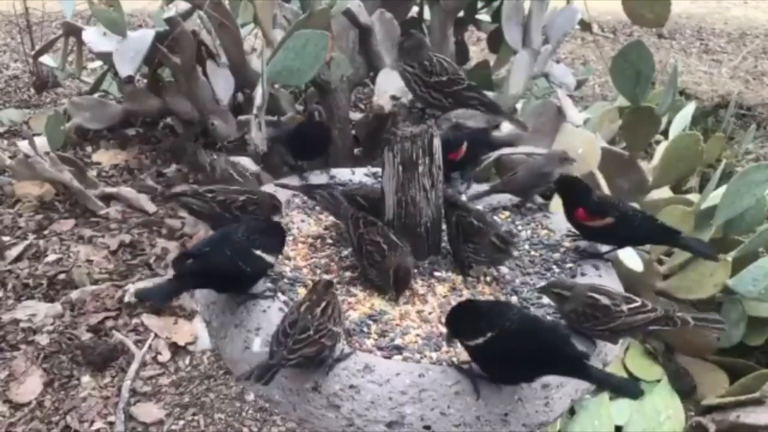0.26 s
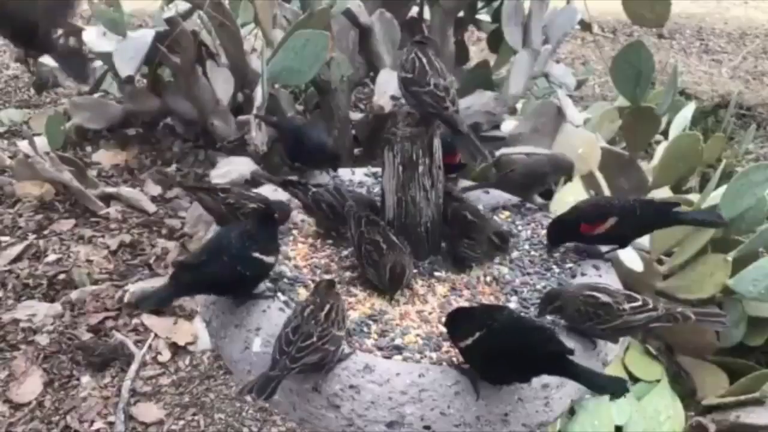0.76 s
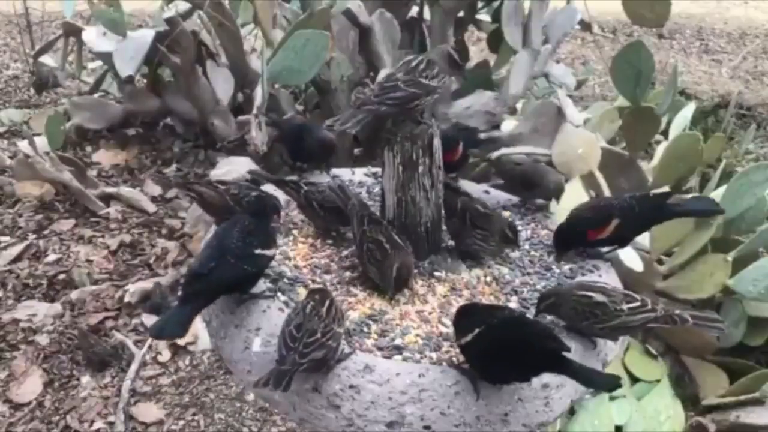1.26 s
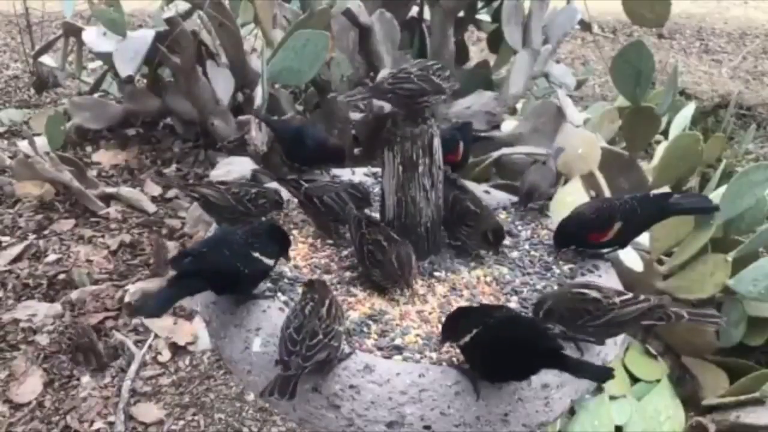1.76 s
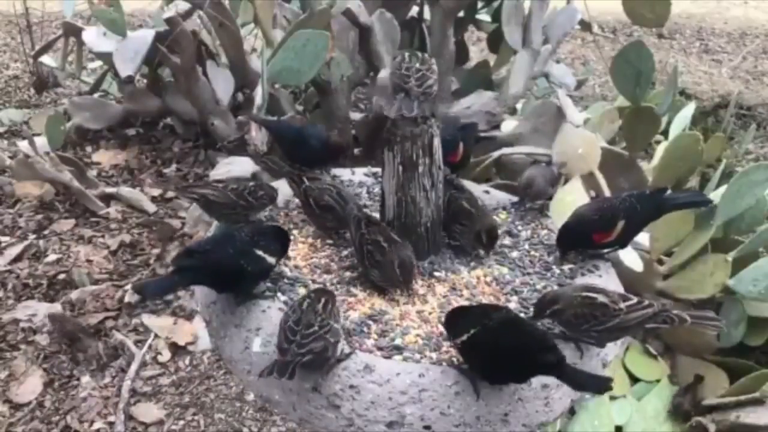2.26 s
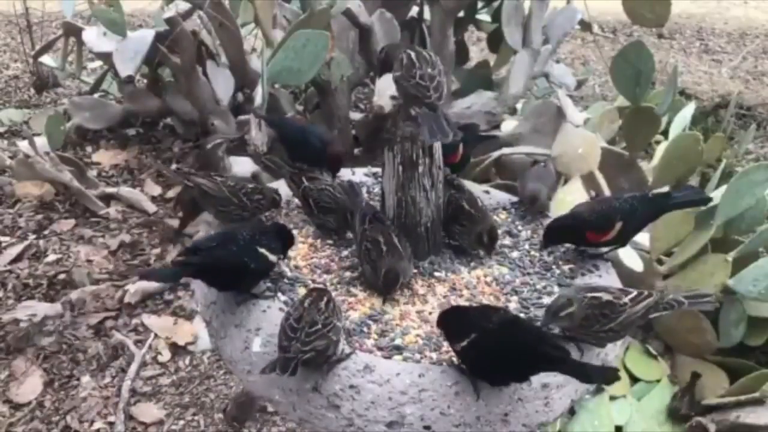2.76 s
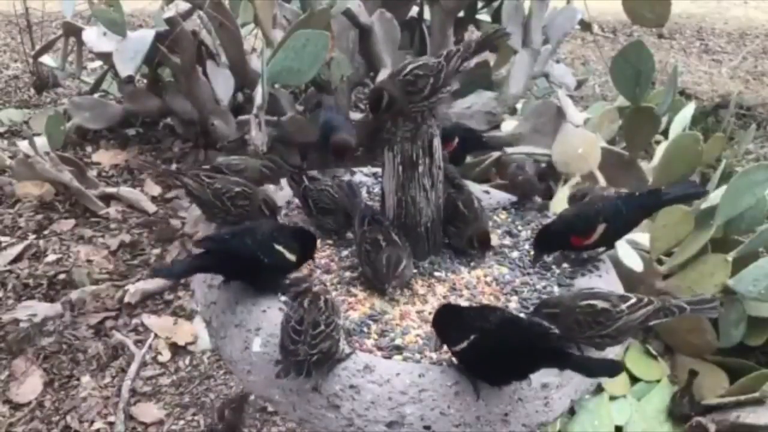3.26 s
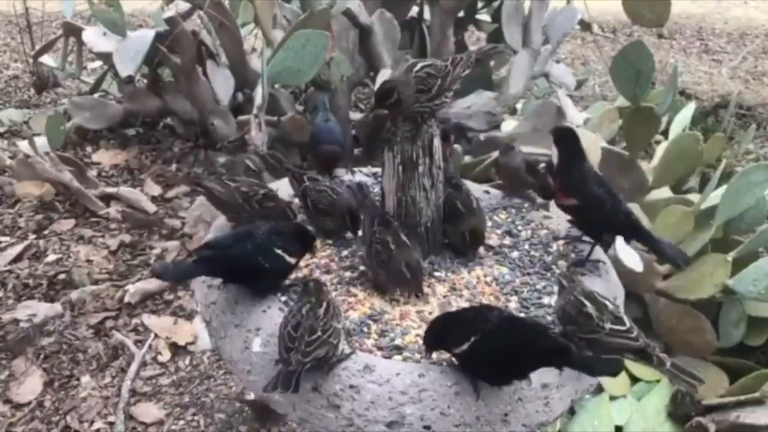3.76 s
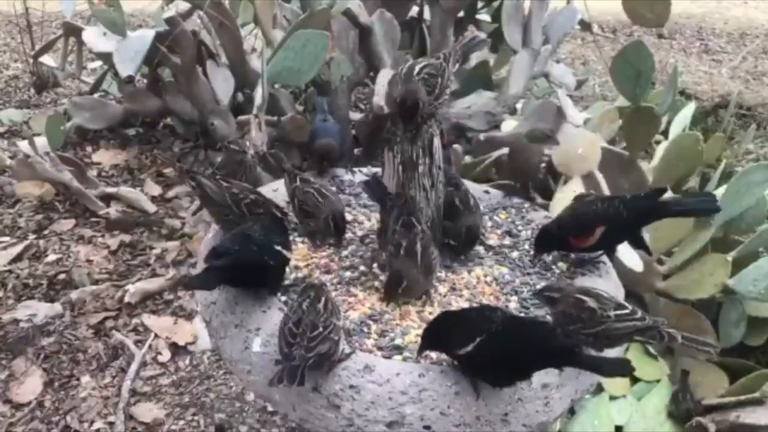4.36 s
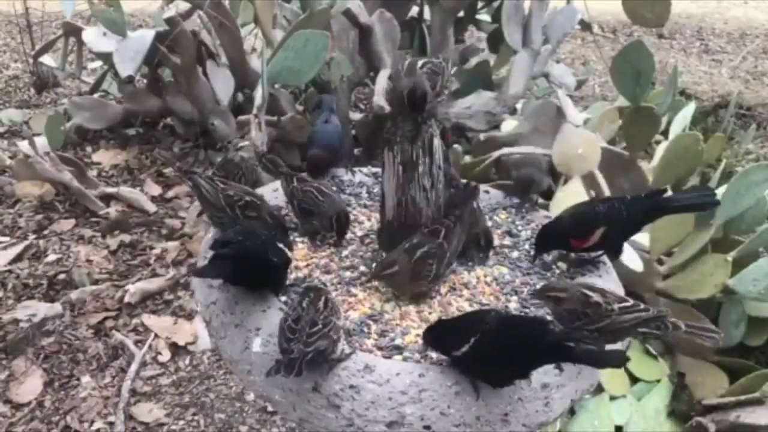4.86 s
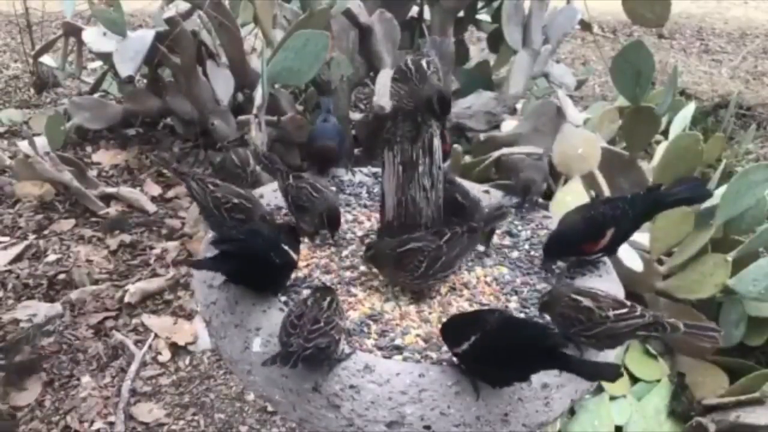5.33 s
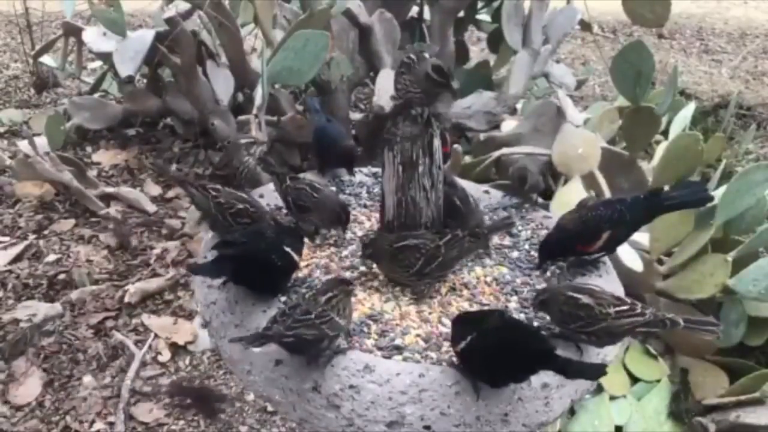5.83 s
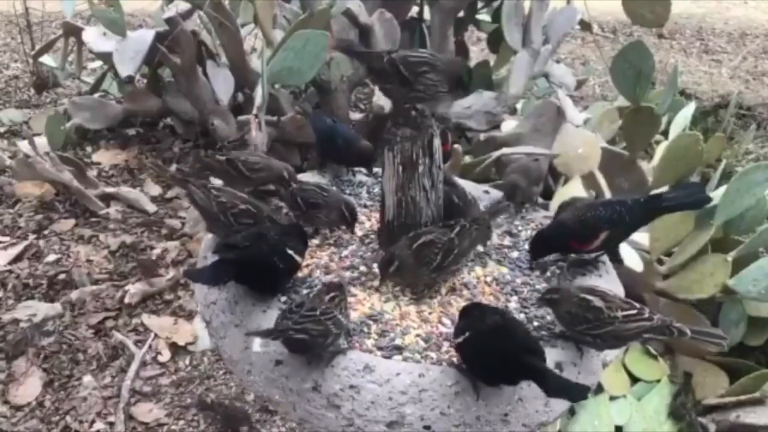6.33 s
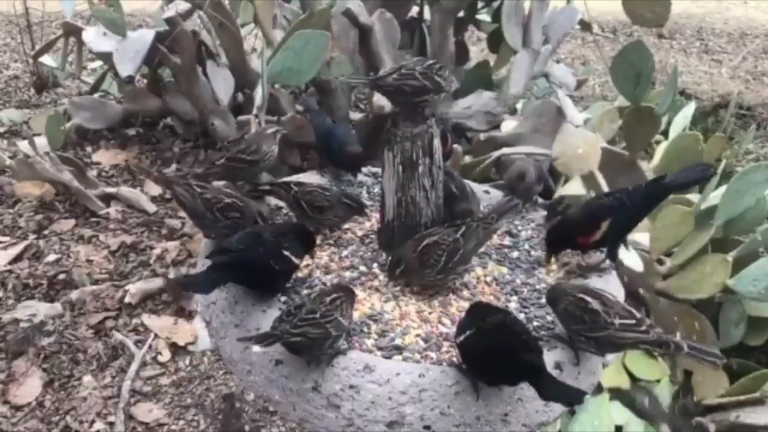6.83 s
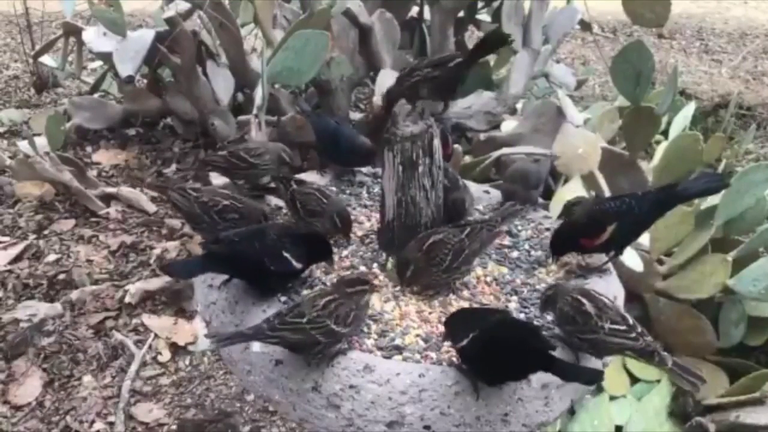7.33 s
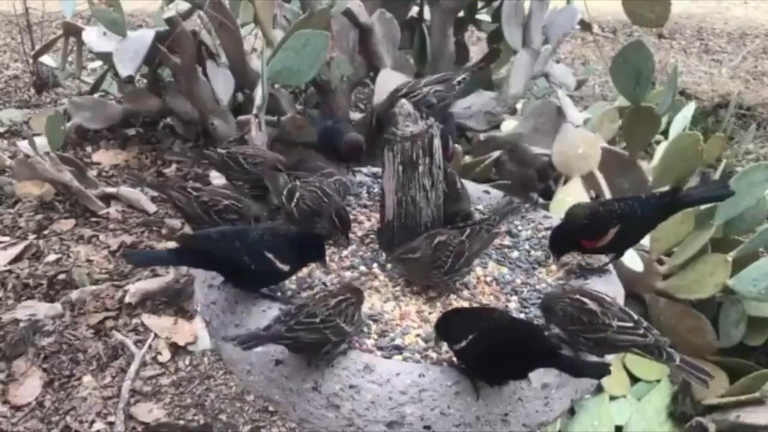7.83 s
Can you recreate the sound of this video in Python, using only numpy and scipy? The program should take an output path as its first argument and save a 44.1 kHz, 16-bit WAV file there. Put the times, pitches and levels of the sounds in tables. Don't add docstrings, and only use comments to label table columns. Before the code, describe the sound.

Blackbirds feed at a stone bowl: sharp husk cracks, beak taps and rustling seed, with clipped chacks, hoarse scolds and gurgles over low traffic rumble.

```python
import sys
import numpy as np
from scipy import signal
from scipy.fft import rfft, irfft, next_fast_len
from scipy.io import wavfile
from scipy.ndimage import map_coordinates

SR = 44100
rng = np.random.default_rng(int(sys.argv[2]) if len(sys.argv) > 2 else 0)


def level_to_linear(level):
    exponent = np.asarray(level, float) / 20
    return 10 ** exponent


def int16_out(signal):
    q = np.round(np.clip(np.atleast_2d(signal).T, -1, 1) * 32767)
    wavfile.write(sys.argv[1], SR, q.astype(np.int16))


N = 356769

# t/s, snap level/dB, knock level/dB, knock f/Hz
HUSK_CRACKS = [(0.1269, -6, -14, 3060), (2.4723, -17, -15, 1890), (2.6325, -19, -20.5, 1800),
               (2.696, -9, -9, 2260), (3.864, -26, -20.5, 3970), (3.904, -17.5, -20, 4500),
               (4.142, -14, -13.5, 2400), (4.429, -18, -14.5, 2800), (4.481, -24, -16, 5130),
               (4.4858, -15.5, -7, 4800), (4.509, -16.5, -19.5, 2420), (4.662, -11, -18.5, 3050),
               (4.681, -18, -22, 5200), (4.77, -16.5, -19, 2210), (5.399, -19, -15, 3790),
               (1.6525, -21.5, -33, 4800), (6.015, -33, -24, 1800), (6.523, -34, -24, 1350),
               (5.821, -23, -28, 4332), (5.9656, -14.5, -21, 1490), (6.3128, -19, -20, 2950),
               (6.3684, -14, -14.5, 3200), (6.7795, -11, -21, 1600), (6.796, -6.5, -17, 2110),
               (7.1027, -25, -11, 2220), (7.1715, -19, -21, 1440), (7.2914, -25, -20.5, 2300),
               (7.328, -30, -16.5, 1900), (7.364, -24, -25, 2520), (7.423, -13.5, -18, 2580),
               (0.7826, -21, -18.5, 3060), (1.144, -21, -24, 4260), (1.6014, -23, -22, 5300)]
# t/s, snap level/dB
DRY_SPLITS = [(.0036, -23), (.1324, -22), (0.144, -23), (.37, -26), (.807, -16), (1.431, -52),
              (1.4723, -21), (1.7186, -27), (1.824, -22.5), (2.193, -19), (2.5446, -19), (3.2797, -14),
              (4.1025, -19.5), (4.161, -17), (4.2, -15), (4.748, -21), (6.188, -16), (6.257, -20),
              (6.6146, -18.5), (6.6823, -24), (6.7202, -16.5), (6.7514, -12.5), (6.8, -16), (6.8868, -30),
              (6.9768, -20), (7.2469, -22), (7.275, -17), (7.302, -16), (7.3788, -17.5), (7.471, -23)]
# t/s, knock level/dB, knock f/Hz
STONE_TAPS = [(0.2069, -23, 5260), (.4299, -21.5, 4300), (0.7493, -31, 2770), (0.7567, -25.5, 1760),
              (0.9303, -21.5, 2830), (0.9382, -23.5, 2760), (1.0955, -29, 3920), (1.675, -22.5, 2070),
              (2.3506, -26.5, 3470), (2.452, -28, 2110), (3.0288, -23, 2050), (3.66, -19, 2350),
              (4.41, -19.5, 2000), (5.3045, -19.5, 3380), (5.542, -23, 3400), (5.7828, -21, 4050),
              (6.5888, -15.5, 1990), (6.7485, -25, 3500), (6.754, -27, 4000), (7.3493, -23, 2800),
              (7.8295, -19.5, 3100), (7.279, -27, 2500), (7.313, -27, 4200), (7.393, -25, 2800),
              (7.785, -29, 1540), (7.977, -24, 2400), (1.057, -25, 6000), (5.13, -25, 5000),
              (5.148, -25, 4500), (5.171, -26, 5500), (5.192, -31, 2000), (5.315, -27, 5000),
              (4.486, -18, 1990), (4.4868, -26, 1000), (3.555, -33, 1700), (5.905, -28, 1300),
              (5.593, -30, 2500), (7.126, -28, 1900)]

# middle t/s, half length t/s, level/dB
SEED_HOPS = [(0.047, 0.073, -39.5), (0.157, 0.043, -34.5), (0.252, 0.058, -38.5), (0.424, 0.087, -41),
             (0.643, 0.026, -37.5), (1.092, 0.18, -39), (1.453, 0.018, -32.5), (1.62, 0.04, -37),
             (1.731, 0.022, -34.5), (1.885, 0.081, -42.5), (2.21, 0.018, -34), (2.447, 0.27, -42.5),
             (2.837, 0.063, -36.5), (3.04, 0.058, -36), (3.172, 0.022, -30.5), (3.45, 0.062, -44.5),
             (3.67, 0.018, -36), (3.967, 0.12, -38.5), (4.156, 0.036, -50), (4.398, 0.26, -38.5),
             (4.71, 0.036, -33.5), (4.898, 0.083, -33.5), (5.107, 0.26, -40), (5.433, 0.076, -34.5),
             (5.613, 0.03, -34.5), (5.917, 0.21, -35), (6.193, 0.023, -36), (6.494, 0.28, -42),
             (6.785, 0.023, -38), (6.916, 0.064, -40)]
# middle t/s, half length t/s, level/dB
SEED_RAKES = [
    (7.08, 0.13, -42.5),
    (7.13, 0.0063, -31.5),
    (7.292, 0.0026, -24.5),
    (7.308, 0.11, -37),
    (7.326, 0.013, -28.5),
    (7.56, 0.028, -37.5),
    (7.665, 0.037, -33),
    (7.95, 0.072, -35),
]
# f/Hz, spectral level/dB
SEED_COLOUR = [(880, -35), (1500, -7), (4130, -0.5), (4920, -2.5), (5540, 2), (7620, -2), (8580, 2),
               (9750, 0.5), (10600, -5.5), (12500, 4), (13300, -0.5)]
# f/Hz, spectral level/dB
TREAD_COLOUR = [(500, -11), (900, -4.5), (1600, -3), (3000, -3.5), (5000, -4.5), (8000, -16)]

# top t/s, rise t/s, top f/Hz, fall t/s, level/dB
CHACK_CALLS = [(.572, 0.013, 3000, 0.0082, -23.5), (1.56, 0.018, 3340, 0.0052, -25),
               (1.632, 0.021, 3582, 0.0036, -10.5), (2.158, 0.016, 2210, 0.0026, -30),
               (2.491, 0.012, 3000, 0.0019, -15.5), (2.583, 0.015, 3000, .004, -23),
               (2.894, .013, 3000, 0.0033, -19.5), (3.041, 0.015, 3870, 0.002, -15.5),
               (3.21, 0.0075, 3000, .002, -19), (3.6154, 0.0092, 3860, 0.0016, -14),
               (2.214, 0.005, 3290, 0.001, -15), (5.221, 0.014, 3420, .001, -17),
               (2.8265, 0.016, 3580, 0.0013, -8.5), (2.817, 0.017, 3310, 0.0028, -15),
               (4.268, 0.02, 3610, 0.0049, -21.5), (4.43, 0.014, 2844, 0.0015, -17),
               (4.83, 0.022, 3590, 0.00041, -4.5), (5.475, 0.0087, 2560, 0.0063, -16),
               (5.638, 0.018, 3000, 0.011, -10), (6.467, 0.013, 3150, 0.0077, -14.5),
               (6.576, 0.016, 3320, 0.0075, -8.5), (3.608, .013, 3720, .001, -24),
               (3.682, .018, 4130, .003, -18), (8.027, 0.018, 3200, 0.0056, -19.5)]
# top t/s, rise t/s, top f/Hz, fall t/s, level/dB
MELLOW_CHACKS = [
    (7.7115, 0.021, 2270, 0.0055, -20),
]
# top t/s, rise t/s, top f/Hz, fall t/s, level/dB
BRIGHT_CHACKS = [
    (1.034, 0.013, 3070, .0012, -26),
    (1.221, 0.011, 2310, .002, -29.5),
    (2.013, 0.011, 2230, 0.0018, -32.5),
    (2.2165, 0.02, 3983, .001, -9.5),
]
# top t/s, rise t/s, top f/Hz, fall t/s, level/dB
SHORT_SCOLDS = [
    (2.958, .011, 1480, .006, -19.5),
    (5.899, .022, 1495, .011, -21.5),
    (7.4295, .011, 1510, 0.008, -15.5),
]
# top t/s, rise t/s, top f/Hz, fall t/s, level/dB
MEMBRANE_STROKES = [(5.639, .003, 3200, .006, -23), (6.467, .012, 3950, .001, -22.5),
                    (5.2205, .002, 3250, 0.00092, -13), (3.632, 0.0034, 3500, .003, -25),
                    (3.681, 0.0018, 3100, 0.0074, -15.5), (1.63, .003, 3300, .004, -16),
                    (9.2, 0.0045, 3000, 0.011, -25.5), (3.6, .008, 3700, .001, -25),
                    (6.582, .004, 2700, .005, -18), (2.827, .004, 4500, .002, -17.5)]
# f/Hz, width f/Hz, level/dB
CHACK_THROAT = [(1490, 590, -7), (3050, 730, -3), (4300, 1500, -9.5)]
# f/Hz, width f/Hz, level/dB
OPEN_BEAK_THROAT = [(3200, 2500, 0), (4600, 2300, 5), (5320, 1100, 4.5)]

# t/s, pitch f/Hz, level/dB
LONG_SCOLDS = [
    [(3.143, 758, -26), (3.155, 931, -15), (3.165, 1248, -9), (3.173, 1490, -10), (3.181, 1487, -9.5),
     (3.19, 1201, -11.5), (3.2, 850, -16), (3.225, 800, -25)],
    [(5.4, 616, -23), (5.41, 801, -14), (5.42, 1230, -11.5), (5.427, 1517, -6.5), (5.44, 1510, -9.5),
     (5.446, 1350, -14), (5.455, 910, -12), (5.48, 800, -27)],
]
# f/Hz, width f/Hz, level/dB
SCOLDING_THROAT = [(3070, 1800, 2.5), (4300, 1640, 4), (5570, 1400, 2.5)]
# t/s, top f/Hz, sweep depth/0-1, level/dB
GURGLE_TRAINS = [
    [(3.563, 1605, 0.57, -42), (3.585, 1650, 0.98, -29), (3.62, 1697, 1.05, -28), (3.645, 1500, .9, -30),
     (3.66, 1250, 0.2, -38)],
    [(4.3795, 1598, .6, -32), (4.41, 1600, .8, -29.5), (4.45, 1404, .9, -31), (4.465, 1250, .4, -33),
     (4.483, 1000, .3, -40)],
    [(4.6935, 1600, .7, -36), (4.72, 1850, 1, -27), (4.745, 1800, 0.99, -27), (4.755, 1603, .5, -27.5),
     (4.78, 1203, .2, -26.5), (4.802, 960, .2, -46)],
    [(5.9155, 1300, .7, -35), (5.93, 1497, .8, -26.5), (5.965, 1700, .95, -25), (5.978, 1907, .8, -25),
     (5.988, 1590, 0.21, -26), (6.0, 1247, 0.08, -31), (6.013, 1150, .15, -36)],
    [(7.145, 1206, 0.47, -38), (7.158, 1600, 0.43, -27.5), (7.185, 1660, 0.53, -22.5),
     (7.205, 1500, 0.32, -25.5), (7.22, 1446, 0.45, -28), (7.236, 1200, .3, -39)],
]
# t/s, f/Hz, level/dB
WHISTLE_GLIDES = [
    [(.157, 4600, -40), (.1595, 4770, -13), (.165, 4920, -10.5), (.171, 5400, -8), (.174, 4930, -15),
     (.177, 4900, -16), (.181, 4000, -28), (.183, 4000, -49)],
    [(3.025, 7271, -48), (3.045, 6680, -22.5), (3.05, 6270, -35), (3.105, 6180, -33.5), (3.114, 6400, -27)],
    [(3.112, 7000, -41), (3.13, 8600, -36), (3.15, 8900, -37), (3.2, 8600, -42), (3.22, 8750, -32),
     (3.245, 8806, -31), (3.262, 9033, -49)],
    [(4.518, 654, -53), (4.53, 633, -34), (4.545, 620, -71)],
    [(1.032, 3300, -30), (1.0352, 3380, -15.5), (1.0385, 3400, -36)],
    [(5.405, 1100, -38), (5.42, 1094, -32), (5.427, 2020, -31), (5.433, 1460, -29), (5.439, 900, -36)],
    [(6.338, 1590, -50), (6.342, 1565, -32), (6.358, 1560, -43)],
]
# f/Hz, width f/Hz, level/dB
SQUABBLE_THROAT = [(1210, 360, 10.5), (2950, 360, 11), (3750, 500, 8), (4600, 550, 7.5), (6200, 890, 1)]

# t/s, level/dB
WING_FLAPS = [(0.327, -36), (3.45, -43), (6.524, -40), (1.091, -37), (1.147, -36), (1.204, -37),
              (6.757, -40), (6.343, -39)]
# middle t/s, half length t/s, level/dB
WING_GUSTS = [
    (0.962, 0.01, -34),
    (1.103, .03, -42),
    (2.303, 0.054, -43),
    (2.42, 0.041, -47),
    (3.915, .03, -43.5),
    (6.752, 0.028, -43.5),
]

# t/s, rumble level/dB
TRAFFIC_LEVEL = [(0.0, -32.5), (0.18, -42), (0.36, -34), (0.68, -38), (1.07, -35), (1.46, -42), (2.0, -37),
                 (2.17, -48.5), (2.36, -37), (3.07, -44.5), (3.37, -44), (3.86, -36), (4.21, -42),
                 (4.8, -41.5), (6.13, -45), (6.92, -41.5), (7.6, -44), (8.09, -46.5)]
# f/Hz, spectral level/dB
RUMBLE_COLOUR = [(12, -33), (20, -11.5), (54, 3), (70, 3), (91, -2), (110, -11), (140, -16), (240, -120)]
# t/s, level/dB
NEAR_ROAD_LEVEL = [(0.0, -50), (2.07, -55.5), (2.48, -53.5), (2.79, -53), (4.96, -53), (5.36, -56),
                   (7.1, -49.5), (7.52, -53), (8.09, -50.5)]
# f/Hz, spectral level/dB
NEAR_ROAD_COLOUR = [(76, -2.5), (130, 0.5), (173, -5.5), (273, -6.5), (360, -6), (468, -10.5), (2000, -22),
                    (2600, -41), (4400, -120)]
# t/s, level/dB
HUM_LEVEL = [(0, -46), (3.85, -52.5), (4.0, -46), (4.3, -43.5), (4.42, -56), (4.6, -42.5), (6.2, -48.5),
             (6.5, -42), (8.09, -40.5)]


def unit(x):
    return x / np.sqrt(np.mean(x ** 2) + 1e-20)


def curves(rows):
    s, *cols = np.transpose(rows)
    return [np.interp(np.arange(N) / SR, s, c) for c in cols]


def wobble(rate, size=N):
    return map_coordinates(rng.standard_normal(N // 8), [np.arange(size) * rate / SR])


def filtered(x, response):
    m = next_fast_len(N + SR // 2)
    return irfft(rfft(x, m) * response(np.fft.rfftfreq(m, 1 / SR)), m)[:N]


def colour(points):
    f, v = np.transpose(points)
    return lambda hz: level_to_linear(np.interp(np.log(hz + 1), np.log(f), v, left=-120, right=-120))


def resonances(modes):
    def response(f):
        total = 0
        for k, (centre, width, db) in enumerate(modes):
            damping = 1j * f * width
            total = total + (-1) ** k * level_to_linear(db) * damping / (centre * centre - f * f + damping)
        return total
    return response


def noise(points):
    return unit(filtered(rng.standard_normal(N), colour(points)))


def add(track, s, sound):
    part = track[round(s * SR):][:len(sound)]
    part += sound[:len(part)]


def cracks():
    snaps, knocks, t = np.zeros(N), np.zeros(N), np.arange(256) / SR
    split_knock_db, split_knock_hz = -19, 5400
    tap_snap_db = -7
    stray_count, stray_db = 12, -27
    splits = [(s, db, db + split_knock_db, split_knock_hz) for s, db in DRY_SPLITS]
    taps = [(s, db + tap_snap_db, db, hz) for s, db, hz in STONE_TAPS]
    strays = [(u * N / SR, stray_db + 3 * v, stray_db + split_knock_db, split_knock_hz)
              for u, v in rng.random((stray_count, 2))]
    for s, snap_db, knock_db, hz in HUSK_CRACKS + splits + taps + strays:
        start = abs(s - .0003)
        burst = np.sign(rng.standard_normal(len(t))) * level_to_linear(-60 * t / 0.0042)
        add(snaps, start, level_to_linear(snap_db + 5) * burst)
        onset = 1 - np.exp(-t / 0.000071)
        decay = level_to_linear(knock_db + 6.0 - 60 * t / 0.004)
        add(knocks, start, decay * onset * np.sin(2 * np.pi * hz * t))
    return filtered(snaps, resonances([(7300, 5900, 0.37), (12900, 700, 3.6)])) + knocks


def shuffle():
    t = np.arange(N) / SR
    bed_db, tread_db, tread_growth = -39.5, -42.5, 0.79
    stir_power = level_to_linear(bed_db) ** 2
    for s, half, db in SEED_HOPS + SEED_RAKES:
        stir_power = stir_power + level_to_linear(db) ** 2 * np.exp(-((t - s) / half) ** 2)
    stir = np.sqrt(stir_power)
    clumps_db = 1.5 * wobble(35) + 1.4 * wobble(110)
    spikes = level_to_linear(clumps_db + 1.6 * wobble(900)) * rng.standard_normal((2, N))
    bright = unit(filtered(spikes[0], colour(SEED_COLOUR)))
    dull = unit(filtered(spikes[1], colour(TREAD_COLOUR)))
    tread = level_to_linear(tread_db) * (stir / stir.mean()) ** tread_growth
    return level_to_linear(1.0) * (stir * bright + tread * dull)


def calls(rows, climb, bend, partials_db, throat, purity_db, hoarse, breath_db,
          octaves=0, croak=0.0077, slide=1.504):
    out = np.zeros(N)
    round_s = 0.00153
    for s, rise, top_hz, fall, db in rows:
        t = np.arange(-rise, fall + croak + .004, 1 / SR)
        from_top = (np.hypot(t, round_s) - round_s) / rise
        drop_octaves = (climb * rise + octaves) * from_top ** bend * np.where(t > 0, slide, 1)
        hz = top_hz * .5 ** drop_octaves
        turn = 2 * np.pi * np.cumsum(hz * (1 + 0.0062 * wobble(375, size=len(t)))) / SR
        thin_db = purity_db * np.clip(1 + t / rise, 0, 1) ** 4.0
        tone = 0
        for k, p in enumerate(partials_db):
            level = level_to_linear(p - k * thin_db + hoarse * wobble(601, size=len(t)))
            tone = tone + level * np.sin((k + 1) * turn + k * k)
        marks = [-rise, -.8 * rise, -min(.007, .6 * rise), -min(.003, .4 * rise), -.001, fall, fall + .003]
        swell = np.interp(t, marks, [0, .2, .55, 1, 1, .5, 0])
        breath = np.interp(t, [-rise, 0, fall + croak], [.3, 1, 0]) * rng.standard_normal(len(t))
        add(out, s - rise, level_to_linear(db) * (swell * tone + level_to_linear(breath_db) * breath))
    return filtered(out, resonances(throat))


def scolds():
    out = np.zeros(N)
    tilts_db = [1, -3.5]
    partials_db = [-9, -7.5, -7, -10.5, -18, -9.5, -19]
    for rows, tilt_db in zip(LONG_SCOLDS, tilts_db):
        s, hz, db = np.transpose(rows)
        t = np.arange(s[0], s[-1], 1 / SR)
        pitch = np.interp(t, s, hz) * (1 + .012 * wobble(393, size=len(t)))
        turn = 2 * np.pi * np.cumsum(pitch) / SR
        tone = 0
        for k, p in enumerate(partials_db):
            level = level_to_linear(p + tilt_db * max(k - 3, 0) + 2.4 * wobble(498, size=len(t)))
            tone = tone + level * np.sin((k + 1) * turn + k * k)
        voiced = np.clip((s[-2] + .003 - t) / .006, 0, 1)
        breath = level_to_linear(-7.5) * rng.standard_normal(len(t))
        add(out, s[0], level_to_linear(np.interp(t, s, db)) * (voiced * tone + breath))

    def throat(f):
        closing = 0.17 + 1 / (1 + (2000 / (f + 1)) ** 6)
        return resonances(SCOLDING_THROAT)(f) * closing
    return filtered(out, throat)


def gurgles():
    out = np.zeros(N)
    flicks_per_s, flick_jitter = 88, 0.017
    for rows in GURGLE_TRAINS:
        s, top_hz, depth, db = np.transpose(rows)
        t = np.arange(s[0], s[-1], 1 / SR)
        pace = flicks_per_s * (1 + flick_jitter * wobble(60, size=len(t)))
        u = np.cumsum(pace) / SR % 1
        deep = np.interp(t, s, depth)
        sweep = np.interp(u, [0, .12, .38, .55, 1], [.3, .42, .92, 1, .62]) ** deep
        swell = np.interp(u, [0, .06, .25, .45, .7, 1], [.15, .65, .75, .55, .38, .06])
        swell = swell ** np.clip(deep + .1, 0, 1)
        pitch = np.interp(t, s, top_hz) * sweep * (1 + 0.039 * wobble(250.3, size=len(t)))
        turn = 2 * np.pi * np.cumsum(pitch) / SR
        tone = np.sin(turn) + 0.21 * np.sin(2 * turn) + 0.26 * np.sin(3 * turn)
        level = level_to_linear(np.interp(t, s, db) + 2.9 * wobble(409, size=len(t)))
        add(out, s[0], level * swell * tone)
    return out


def whistles():
    out = np.zeros(N)
    for rows in WHISTLE_GLIDES:
        s, hz, db = np.transpose(rows)
        t = np.arange(s[0], s[-1], 1 / SR)
        turn = 2 * np.pi * np.cumsum(np.interp(t, s, hz)) / SR
        tremble_db = 1.2 * np.sin(2 * np.pi * 75 * (t - s[0])) + 1.2 * wobble(304, size=len(t))
        tone = np.sin(turn) + 0.045 * np.sin(2 * turn)
        add(out, s[0], level_to_linear(np.interp(t, s, db) + tremble_db) * tone)
    return out


def squabble():
    start_s, attack_s, hold_s, release_s = 3.968, 0.014, 0.1, .05
    level_db, sag_db = -24.5, 4.5
    cycle = np.cumsum(92 * (1 + 0.1 * wobble(60))) / SR % 1
    voice = rng.standard_normal(N) * (0.82 + np.exp(-cycle / 0.74))
    marks = start_s + np.cumsum([0, attack_s, hold_s, release_s])
    swell = np.interp(np.arange(N) / SR, marks, [0, 1, level_to_linear(-sag_db), 0])

    def throat(f):
        return resonances(SQUABBLE_THROAT)(f) / (1 + (750 / (f + 1)) ** 8)
    return level_to_linear(level_db) * swell * unit(filtered(voice, throat))


def flaps():
    shape, t = np.zeros(N), np.arange(1536) / SR
    for s, db in WING_FLAPS:
        add(shape, s - .012, level_to_linear(db) * np.exp(-((t - .012) / 0.016) ** 2))
    return shape * noise([(90, -6), (200, -7.0), (500, -8.0), (1500, -4.0), (4000, -26)])


def gusts():
    t = np.arange(N) / SR
    shape = sum(level_to_linear(db) * np.exp(-((t - s) / half) ** 2) for s, half, db in WING_GUSTS)
    return shape * noise([(90, -12), (160, 1.5), (260, -2), (450, -13.0), (800, -15)])


def ground_echo(voices):
    delayed = np.roll(voices, round(0.013 * SR))
    return level_to_linear(-20.5) * filtered(delayed, resonances([(3230, 2900, 0)]))


def ground(x):
    t = np.arange(4096) / SR
    tail = rng.standard_normal(len(t)) * level_to_linear(-60 * t / 0.053) * (t > .002)
    wet = signal.fftconvolve(x, tail / np.linalg.norm(tail))[:N]
    return filtered(wet, resonances([(3000, 55000, 0)]))


def background():
    rumble_db, = curves(TRAFFIC_LEVEL)
    drone_db, = curves(NEAR_ROAD_LEVEL)
    hum_db, = curves(HUM_LEVEL)
    rumble = level_to_linear(rumble_db) * noise(RUMBLE_COLOUR)
    drone = level_to_linear(drone_db + 4) * noise(NEAR_ROAD_COLOUR)
    hum = np.sin(2 * np.pi * np.cumsum(118 + 1.703 * wobble(6.8)) / SR)
    return rumble + drone + level_to_linear(hum_db + 3.5 * wobble(5)) * hum


def scene():
    chacks = calls(CHACK_CALLS, climb=92, bend=.63, partials_db=[0, 0, -10], throat=CHACK_THROAT,
                   purity_db=26, hoarse=3.4, breath_db=-8.5)
    mellow = calls(MELLOW_CHACKS, climb=66, bend=0.98, partials_db=[0, 9, -15], throat=CHACK_THROAT,
                   purity_db=25, hoarse=2.1, breath_db=-13)
    bright = calls(BRIGHT_CHACKS, climb=78, bend=.72, partials_db=[-2.0, 6.5, 0, -17.5],
                   throat=OPEN_BEAK_THROAT, purity_db=18.0, hoarse=0.81, breath_db=-2)
    snarls = calls(SHORT_SCOLDS, climb=0, bend=1.05, partials_db=[-14, -6.5, -5.5, -17, -20],
                   throat=SCOLDING_THROAT, purity_db=1.5, hoarse=2.1, breath_db=-10,
                   octaves=.75, croak=.01, slide=0.96)
    strokes = calls(MEMBRANE_STROKES, climb=70.6, bend=1.0, partials_db=[0], throat=OPEN_BEAK_THROAT,
                    purity_db=0, hoarse=2.7, breath_db=-5, slide=0.88)
    voices = chacks + mellow + bright + snarls + strokes
    voices = voices + scolds() + gurgles() + whistles() + squabble()
    voices = voices + ground_echo(voices)
    beaks = cracks()
    scatter = level_to_linear(-11) * ground(voices) + level_to_linear(-16) * ground(beaks)
    return (beaks + shuffle() + voices + flaps() + gusts() + scatter + background())[None]


def top_cut(x):
    return signal.sosfilt(signal.butter(12, 14400, fs=SR, output="sos"), x)


def record(dry):
    limit, top_hz = 1.05, 13150
    soft = dry[0] / (1 + np.abs(dry[0] / limit) ** 6) ** (1 / 6)

    def band_limit(hz):
        leak = level_to_linear(-30) * (hz < 14400)
        return 1 / (1 + (hz / top_hz) ** 120) + leak
    mix = filtered(soft, band_limit)[None]
    return top_cut(mix)


dry = scene()
out = record(dry)
int16_out(out)
```